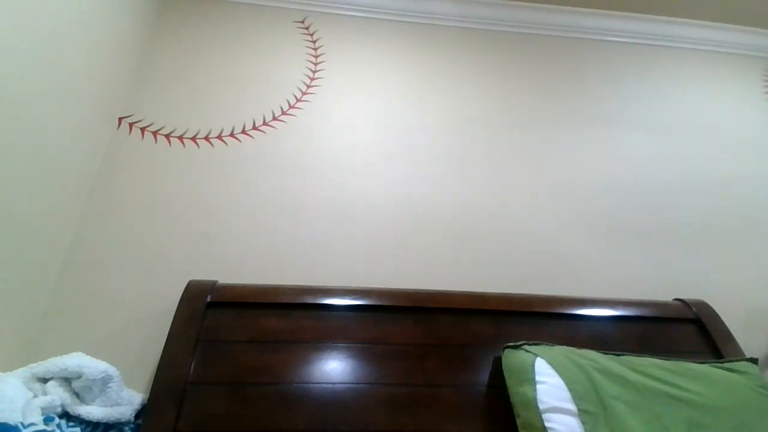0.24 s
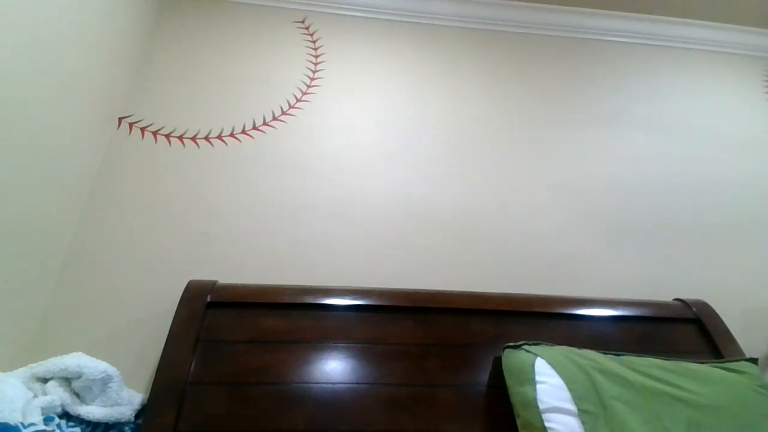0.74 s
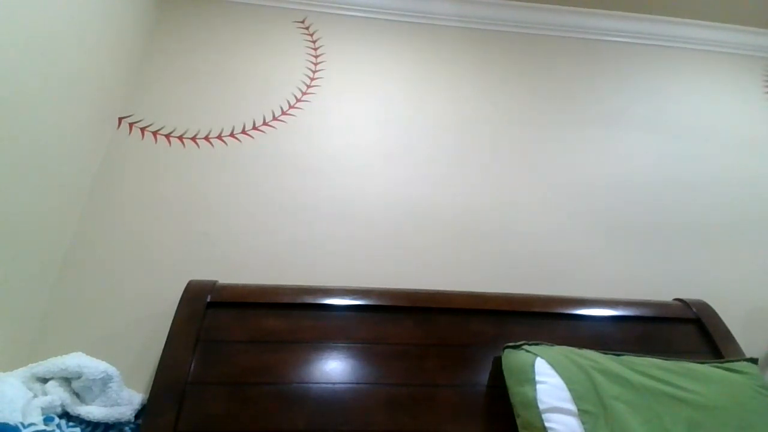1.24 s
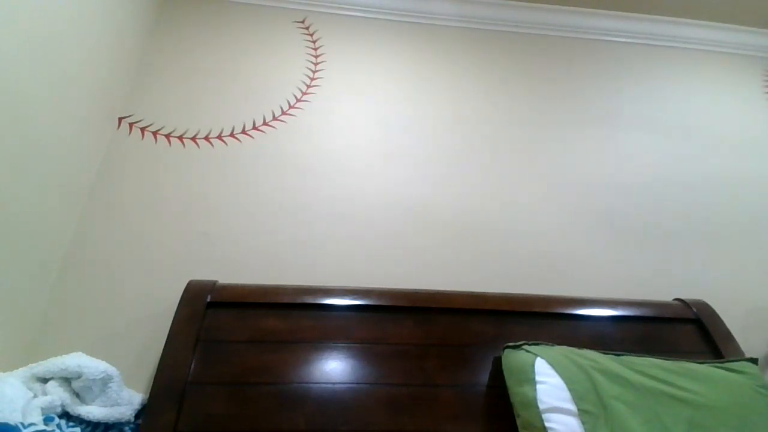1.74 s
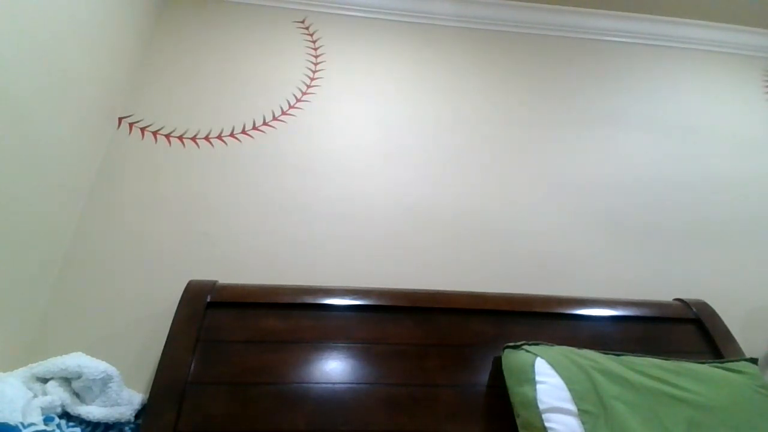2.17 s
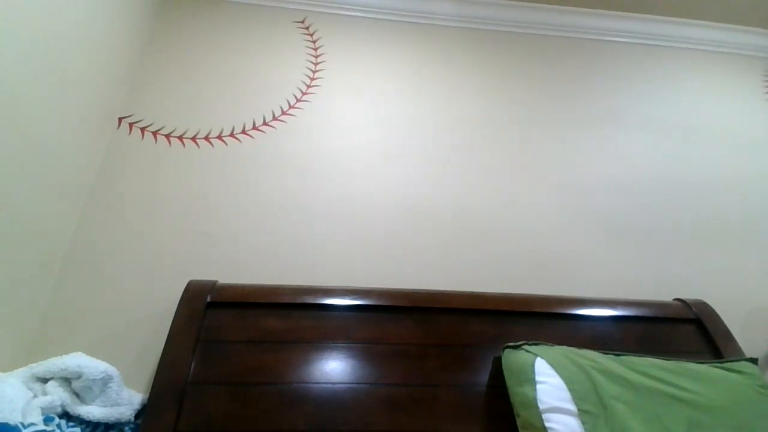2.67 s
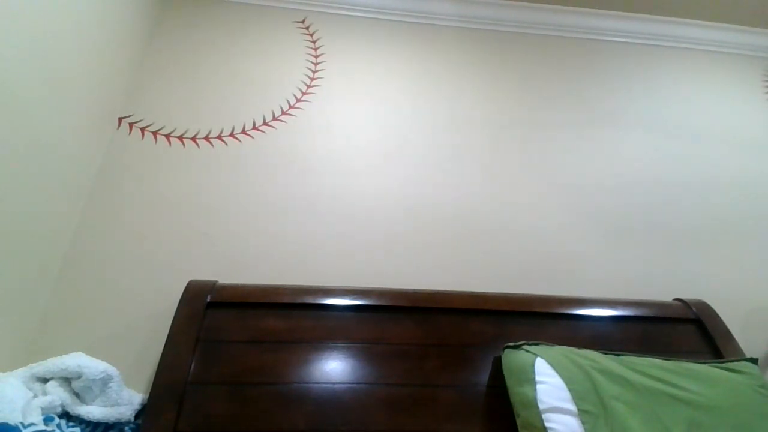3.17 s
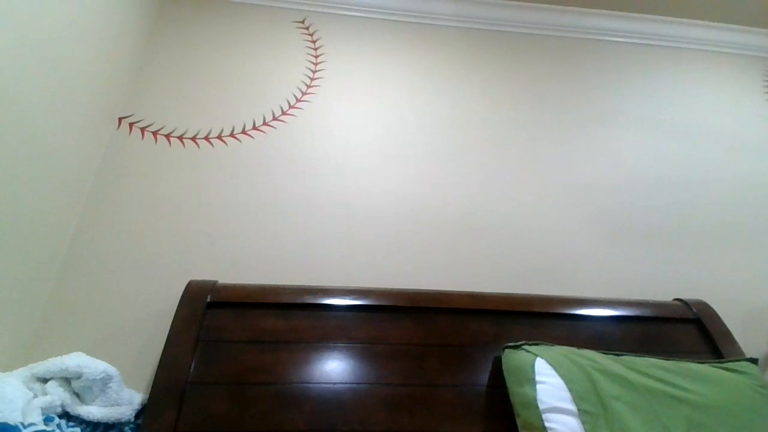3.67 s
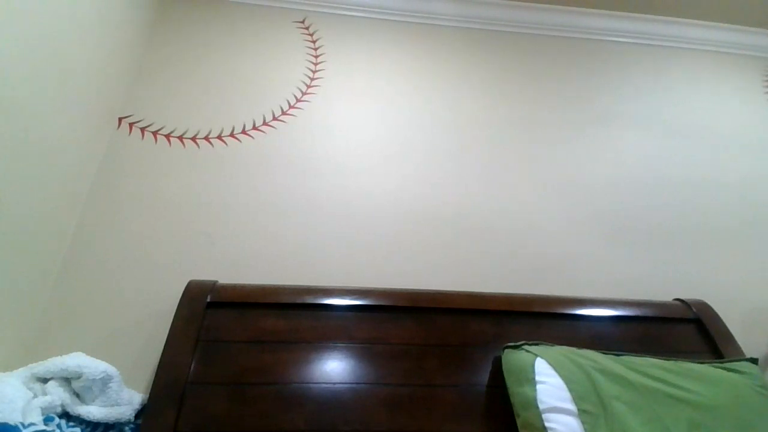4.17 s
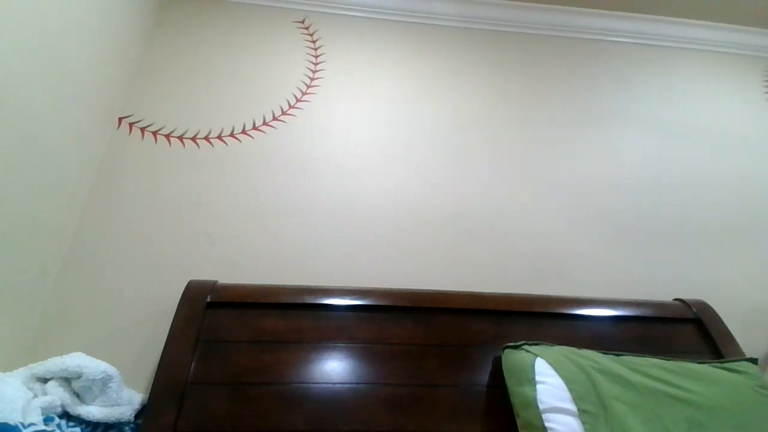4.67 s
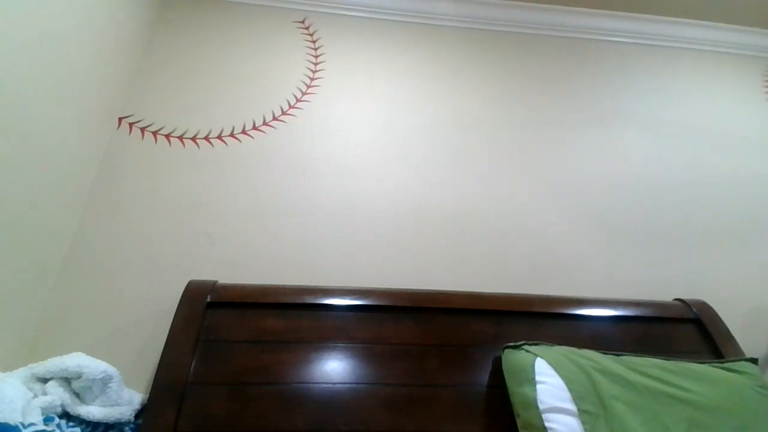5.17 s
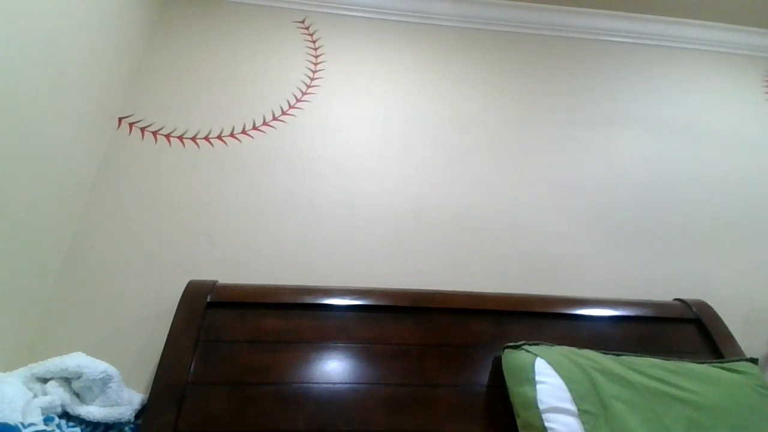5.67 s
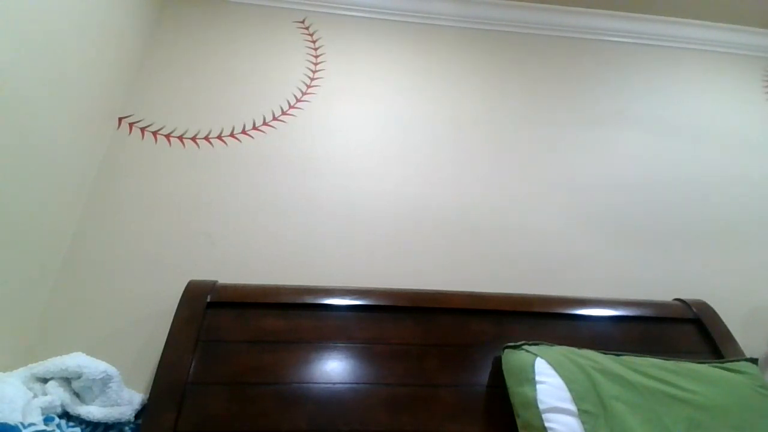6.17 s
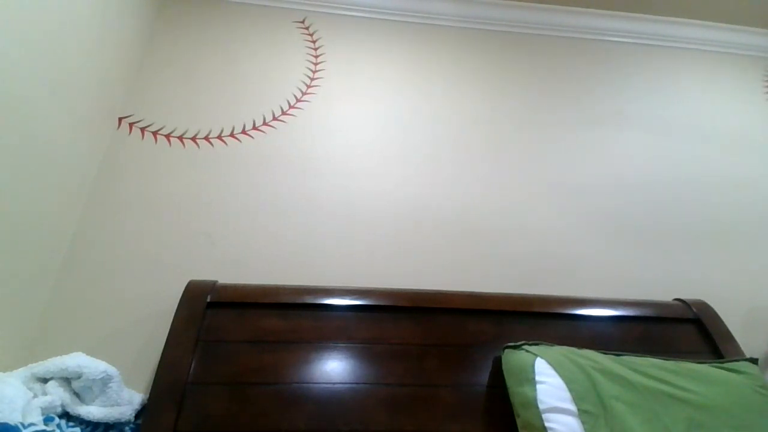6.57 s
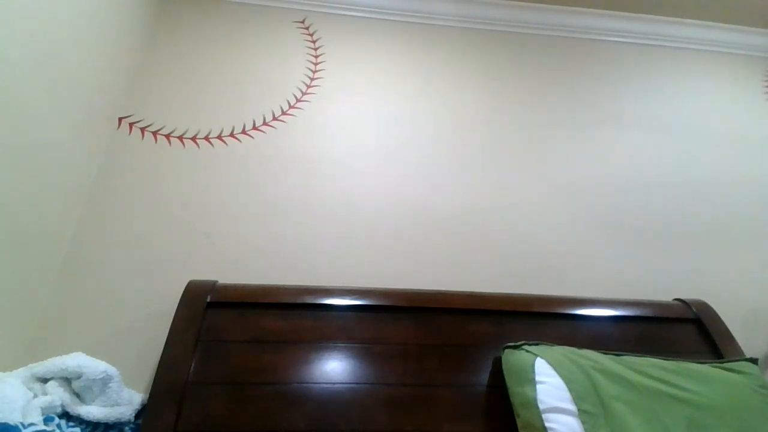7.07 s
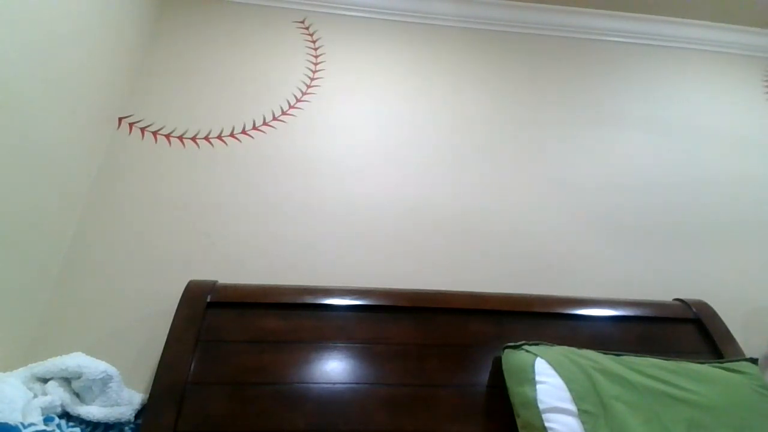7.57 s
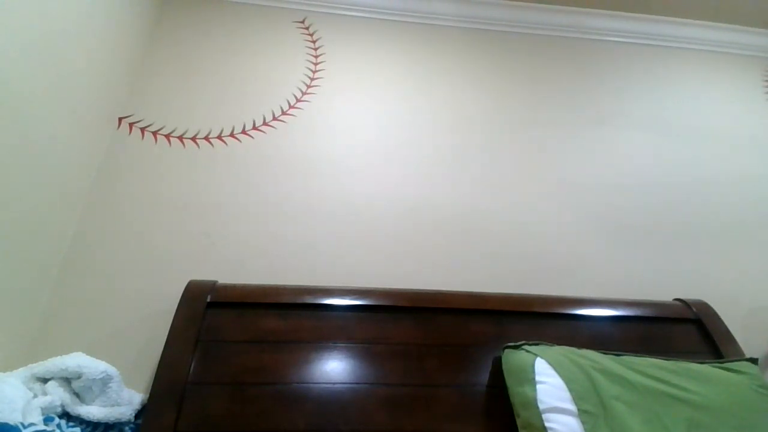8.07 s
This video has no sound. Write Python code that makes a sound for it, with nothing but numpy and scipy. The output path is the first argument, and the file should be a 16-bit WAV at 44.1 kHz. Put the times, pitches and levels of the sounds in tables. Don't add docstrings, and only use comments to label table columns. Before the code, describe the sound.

Close stereo pickup in a furnished bedroom with brief reflections: unseen hands stir pencils, markers and loose paper. Irregular hollow clacks and short scrapes build to a busy clatter and one heavy furniture thud, thin out to isolated knocks, resume with light plastic clinks, then shift to brighter paper rustling with small snaps and a hard tick near the end. Steady low fan rumble, slow air pressure wobble and slight hiss.

```python
import sys
import numpy as np
from scipy import signal
from scipy.fft import rfft, irfft, next_fast_len
from scipy.io import wavfile
from scipy.ndimage import map_coordinates

SR = 44100
rng = np.random.default_rng(int(sys.argv[2]) if len(sys.argv) > 2 else 0)


def to_linear_factor(level_db):
    exponent = np.asarray(level_db, float) / 20
    return 10 ** exponent


def master(y):
    cut = np.clip(np.atleast_2d(y).T, -1, 1)
    pcm = np.round(cut * 32767)
    wavfile.write(sys.argv[1], SR, pcm.astype(np.int16))


N = 366912
SHARED_ONLY = [[1], [0]]


def unit(x):
    return x / np.sqrt(np.mean(x ** 2) + 1e-20)


def along(points, hz):
    f, v = np.transpose(points)
    return np.interp(np.log(hz + .1), np.log(f + .1), v)


def wobble(rate):
    knots = rng.standard_normal(int(N * rate / SR) + 4)
    return map_coordinates(knots, [np.arange(N) * rate / SR])


def noise():
    return rng.standard_normal((2, N))


def filtered(x, response):
    m = next_fast_len(N + SR // 2)
    gain = response(np.fft.rfftfreq(m, 1 / SR))
    gain = gain / np.sqrt(np.mean(np.abs(gain) ** 2))
    return irfft(rfft(x, m) * gain, m)[..., :N]


def coloured(points):
    return lambda hz: to_linear_factor(along(points, hz))


def resonant(peaks, top_hz=20000):
    def response(f):
        total = 0
        for k, (centre, width, db) in enumerate(peaks):
            damping = 1j * f * width
            total = total + (-1) ** k * to_linear_factor(db) * damping / (centre ** 2 - f ** 2 + damping)
        return total / (1 + 1j * f / top_hz) ** 2
    return response


def add(track, s, sound):
    part = track[..., round(s * SR):][..., :sound.shape[-1]]
    part += sound[..., :part.shape[-1]]


def supplies():
    # centre_hz, width_hz, level_db
    box_modes = [(229, 80, -1.5), (343, 120, -1), (457, 90, -1), (853, 285, -1.5)]
    pencil_modes = [(910, 43, 10.5), (1170, 590, 7), (1410, 184, 12.5), (1900, 1380, 1), (2200, 63, -3)]
    pad_modes = [(404, 95, -1.5), (690, 84, 4.5), (1200, 350, 3.5), (1800, 1020, 1.5), (2830, 420, -1.5)]
    # frequency_hz, level_db
    plastic_colour = [(1200, -12.5), (2200, -6.5), (3200, -4), (4800, -7), (6500, -13), (10000, -19.5)]
    paper_colour = [(3000, -10), (5500, 4.5), (8000, 6), (11000, 4), (14000, 0), (16000, 1)]
    swept_colour = [(3000, -10.5), (4400, 1.5), (5500, 1.5), (7000, 2), (9600, -1.5), (11500, 3.5),
                    (13700, 5), (16000, 2)]
    blows, notes = knocks()
    at_pad = np.arange(N) > 6.2 * SR
    blows = np.vstack([blows[0], blows[1] * ~at_pad, blows[2:], blows[1] * at_pad])
    bodies = [resonant(box_modes, top_hz=930), resonant(pencil_modes, top_hz=2970),
              coloured(plastic_colour), coloured(paper_colour), resonant(pad_modes, top_hz=4100)]
    forces = blows + slide()
    box, pencils, plastic, paper, pad = [filtered(f * noise(), body) for f, body in zip(forces, bodies)]
    paper = np.where(at_pad, filtered(paper, coloured(swept_colour)), paper)
    return notes + box + pencils + plastic + pad + paper


def knocks():
    # start_s, peak_db, hardness_db, pitch_hz
    on_pencils = [(0.001, -44.5, -7.5, 910), (0.365, -40, -16.5, 1140), (0.554, -39.5, -27, 1170),
                  (1.268, -33.5, -17, 1210), (1.382, -51, -5, 1170), (1.955, -26.5, 1.5, 1130),
                  (1.96, -32.5, -1.5, 1400), (2.594, -43.5, -15, 930), (2.819, -34.5, -10.5, 1140),
                  (3.113, -39.5, -19.5, 1530), (3.118, -53, -34, 1990), (3.659, -34.5, -0.5, 1100),
                  (3.68, -52.5, 7, 950), (3.666, -45, -1, 1040), (3.741, -47, -18, 1100),
                  (4.846, -58, -26, 910), (4.888, -47.5, -33, 1310), (4.91, -45, -32, 1250),
                  (5.011, -50, -19, 1710), (5.094, -45, -23, 880), (5.24, -38.5, -27, 930),
                  (5.262, -35.5, -25, 1160), (5.519, -48, -37, 1230), (5.773, -48.5, -20, 1210),
                  (7.549, -60.5, -7.5, 1410)]
    # start_s, peak_db, hardness_db, pitch_hz
    on_markers = [(0.794, -49.5, -26, 1340), (1.113, -52, -7, 1510), (1.128, -55, -5, 2000),
                  (1.653, -44, -19, 1200), (1.67, -40, -5.5, 1220), (1.8, -35, -26, 1010),
                  (1.876, -30.5, -3.5, 1300), (1.883, -30, -1, 990), (2.022, -33, -9, 1510),
                  (2.033, -43, -17, 1400), (2.784, -41.5, -21, 1010), (3.569, -52, -14, 1020),
                  (5.044, -49, -6.5, 910), (5.157, -44.5, -12, 885), (5.177, -52.5, 2.5, 910),
                  (5.071, -51, -5.5, 1400), (5.195, -55, 0, 1300), (5.564, -44.5, -6.5, 930),
                  (5.621, -52.5, 1, 1010), (5.674, -39, -4.5, 1410), (5.716, -36.5, -20, 910),
                  (5.978, -65.5, 7.5, 1020), (6.484, -47, -10, 1260), (7.285, -51, -0.5, 1720),
                  (7.298, -63, -4.5, 2360), (7.312, -68, -7, 2000), (7.838, -36, 4, 1750),
                  (7.845, -38, -24, 1730), (7.862, -46, -10, 1570)]
    # start_s, peak_db, hardness_db, pitch_hz
    on_box = [(0.506, -33, -11, 1350), (0.513, -38, -19, 1410), (0.649, -43.5, -8.5, 930),
              (0.575, -51, -25, 1700), (0.595, -63, -25, 1300), (0.733, -53, -43, 1260),
              (1.356, -32.5, -19, 1180), (1.463, -38, -38, 1350), (1.609, -51, -18, 910),
              (1.761, -56, -48, 1090), (1.783, -37, -13, 1750), (2.293, -48.5, -5, 1070),
              (2.373, -51, -4.5, 1000), (2.388, -46, -10, 1700), (2.403, -29, -24, 860),
              (2.441, -52, -28, 848), (3.071, -50, -20, 955), (3.612, -41, -27, 1500),
              (3.53, -59, -25, 1000), (3.64, -59, -33.5, 1010), (4.364, -66, -27, 1030),
              (4.963, -45, -36, 1450), (5.418, -44.5, -20, 1400), (6.453, -47.5, -4, 1290),
              (7.042, -62, -3, 1800), (7.485, -53, -33, 1080)]
    # start_s, peak_db, hardness_db, pitch_hz
    snaps = [(1.934, -43.5, 10, 1430), (1.941, -46, 14.5, 1500), (1.9, -51, -13, 1090),
             (2.012, -40.5, -16, 1390), (2.277, -53.5, -8, 900), (2.561, -50.5, -9, 1080),
             (2.678, -49.5, -10.5, 1080), (3.336, -74, 12.5, 770), (6.387, -64, -2, 1130),
             (6.558, -53, -18, 696), (6.58, -51, -35, 1400), (6.614, -65.5, 7, 674),
             (6.628, -54.5, -5, 2120), (6.996, -72, 5, 1310), (7.098, -71.5, 11.5, 974),
             (7.229, -78, 12.5, 818), (7.639, -61.5, 5, 1530)]
    # start_s, peak_db, hardness_db, pitch_hz
    bumps = [(2.913, -57, -32, 900), (4.482, -49, -24, 790), (7.686, -50.5, -12, 890),
             (4.565, -39, -16.5, 980), (5.587, -52, -14, 1110), (5.627, -66, -22, 1300)]
    # knocks, box over pencils dB, crack over tap dB
    kinds = [(on_pencils, -9.5, 2), (on_markers, -8, -18), (on_box, -5.5, 2), (snaps, 2.3, 6.4),
             (bumps, 8.9, 0.74)]
    contact_s = 0.0058
    first_touch = 1
    rise = np.array([[.6], [.5], [.2], [.15]])
    stretch = np.array([[1.9], [1.8], [1.5], [1.45]])
    force, notes, t = np.zeros((4, N)), np.zeros((2, N)), np.arange(SR // 12) / SR
    for table, box_db, crack_db in kinds:
        for s, db, hard_db, hz in table:
            levels = db + np.array([[box_db - 5.5], [-7], [hard_db + 1.0], [hard_db + crack_db - 1.0]])
            hold_s = contact_s * np.clip(to_linear_factor(-.3 * (levels.max() + 30)), .9, 1.8)
            ending = t / (hold_s * stretch)
            contact = (1 - np.exp(-(t / (hold_s * rise)) ** 2)) * np.exp(-ending ** 4)
            contact = contact * (first_touch + ending) / (first_touch + .5)
            add(force, s, to_linear_factor(levels) * contact)
            pencil = signal.iirpeak(hz, 2.4, SR)
            rough = contact[1] * rng.standard_normal((2, len(t)))
            note = signal.lfilter(*pencil, signal.lfilter(*pencil, rough))
            add(notes, s, to_linear_factor(db + 6.5) * note)
    stutter = to_linear_factor(3 * np.tanh([wobble(250), wobble(300), wobble(450), wobble(450)]))
    return force * stutter, notes


def slide():
    # peak_s, rise_s, fall_s, pencils_db, paper_over_pencils_db
    stirs = [(0.54, 0.023, 0.25, -58, -24), (1.34, 0.098, 0.31, -50, -4.5), (1.46, 0.18, 0.05, -45.5, -27),
             (1.72, 0.28, 0.082, -48.5, -16), (1.93, 0.061, 0.062, -37, -12),
             (2.06, 0.23, 0.12, -48.5, -15), (2.39, 0.017, 0.13, -39.5, -13), (2.49, 0.16, 0.45, -46, -8),
             (2.8, 0.044, 0.3, -61, -18), (3.62, 0.14, 0.072, -55, -20), (3.68, 0.017, 0.1, -51, 2),
             (4.53, 0.88, 0.31, -64, -7), (5.06, 0.057, 0.067, -37.5, -13),
             (5.71, 0.047, 0.076, -43, -10.5), (0.58, .04, 0.044, -62, -20), (5.22, 0.18, 0.18, -46, -10),
             (5.42, 0.1, 0.12, -51.5, -17), (5.62, 0.14, 0.13, -44, -35), (5.92, 0.069, 0.4, -67, 0)]
    # peak_s, rise_s, fall_s, paper_db, pencils_over_paper_db
    sweeps = [(6.41, 0.086, 0.36, -50.5, -9.5), (6.48, 0.037, 0.081, -56, 14), (6.55, .03, 0.025, -66, 3),
              (6.632, 0.011, 0.19, -49, -11), (6.725, 0.066, 0.047, -38.5, -20.5),
              (6.82, 0.056, 0.028, -49, -8.5), (6.9, 0.19, 0.22, -46.5, -25.5),
              (7.005, 0.011, 0.036, -61, -11), (7.045, 0.2, 0.049, -60.5, 13),
              (7.105, 0.015, .03, -63, -20), (7.29, 0.033, 0.14, -47.5, -12), (7.42, 0.018, 0.053, -65, -5),
              (7.58, 0.05, 0.061, -52.5, 0), (7.655, 0.013, 0.069, -54, -23), (7.71, 0.05, 0.23, -44, -1),
              (7.78, 0.078, 0.16, -46.5, 3.5), (7.865, 0.061, 0.17, -53, 8.5), (7.98, 0.055, 0.11, -56, -6),
              (8.045, 0.066, 0.06, -62, -21), (8.32, 0.0026, 0.1, -43, -18)]
    # peak_s, rise_s, fall_s, box_db, pencils_over_box_db
    rocks = [(0.72, 0.21, 0.13, -56.5, 1), (1.8, .03, 0.14, -46.5, -15), (2.32, 0.052, 0.029, -52, -16),
             (2.47, 0.065, 0.096, -39, -18), (2.9, 0.38, 0.094, -54, -26), (3.66, 0.11, 0.12, -51.5, -8),
             (4.93, 0.096, 0.13, -57, -6), (7.48, 0.076, 0.058, -65, 6)]
    # level_db of box, pencils, plastic, paper
    rest_db = [-72, -81, -102, -80]
    slips = 1.5 * wobble(30) + 1.8 * wobble(180)
    grip = np.array([[1.1], [1.1], [.9], [.6], [1.2]])
    heap = strokes(stirs, layer_db=[-10, -2, -0.5, 0], share=[0, 0, 1, 1], rounded=1.26)
    heap = heap + strokes(rocks, layer_db=[-0.5, -8, -43, -15], share=[0, 1, 1, 1], rounded=1.44)
    box, pad, plastic, paper = strokes(sweeps, layer_db=[-10.5, -1, -1.5, 0.5],
                                       share=[0.9, 0.69, 0.59, 0.014], rounded=1.56)
    heap = heap + to_linear_factor(rest_db)[:, None] + [box, 0 * pad, plastic, paper]
    return np.vstack([heap, pad]) * to_linear_factor(-5.5 + grip * slips)


def strokes(rows, layer_db, share, rounded):
    t, force = np.arange(0, N, 64) / SR, 0
    for s, rise, fall, db, mix_db in rows:
        away = np.where(t < s, (s - t) / abs(rise), (t - s) / abs(fall))
        levels = db + np.array(layer_db) + mix_db * np.array(share)
        force = force + to_linear_factor(levels[:, None] - 20 * away ** rounded)
    return np.array([np.interp(np.arange(N) / SR, t, layer) for layer in force])


def taps():
    # start_s, peak_db, pitch_hz
    pencil_taps = [(0.376, -39, 1220), (0.515, -21.5, 1228), (0.526, -36, 1240), (0.537, -37, 1220),
                   (0.554, -33, 1170), (0.562, -33, 1350), (0.579, -36, 930), (0.591, -46, 1260),
                   (0.655, -47, 1280), (0.738, -39, 1290), (0.799, -45, 1200), (1.276, -28, 1184),
                   (1.285, -37, 1150), (1.296, -39, 1130), (1.361, -37, 1230), (1.372, -36, 1240),
                   (1.382, -34, 1180), (1.469, -29, 1310), (1.48, -35, 1370), (1.654, -35, 1200),
                   (1.681, -36, 1090), (1.768, -41, 1140), (1.799, -31, 1350), (1.806, -25.5, 930),
                   (1.877, -25, 1267), (1.886, -26, 1250), (1.943, -25, 1480), (1.96, -24, 1170),
                   (2.029, -26, 1410), (2.398, -31, 1380), (2.408, -36, 880), (2.42, -29, 1410),
                   (2.432, -39, 1130), (2.499, -34, 953), (2.604, -38, 910), (2.79, -27.5, 1017),
                   (2.815, -45, 1044), (2.826, -28, 1185), (2.844, -32, 1140), (3.12, -33, 970),
                   (3.616, -39, 790), (3.666, -28.5, 990), (3.684, -33, 915), (3.743, -33, 1163),
                   (4.484, -47, 810), (4.568, -38, 980), (4.589, -40, 1070), (4.974, -40, 1520),
                   (5.049, -33, 1410), (5.075, -39, 1110), (5.249, -32.5, 934), (5.264, -33, 1130),
                   (5.571, -41, 1070), (5.589, -31, 1120), (5.629, -36, 1226), (5.682, -31, 915),
                   (5.716, -39, 923), (5.736, -36, 1510), (7.044, -45, 1066), (7.844, -21, 1750)]
    rise_s, t60_s, overtone, overtone_db = 0.0015, 0.033, 1.7, -15
    out, t = np.zeros(N), np.arange(SR // 20) / SR
    for s, db, hz in pencil_taps:
        shape = (1 - np.exp(-(t / rise_s) ** 2)) * to_linear_factor(db - 1.5 - 60 * t / t60_s)
        phase = 2 * np.pi * hz * t
        add(out, s, shape * (np.sin(phase) + to_linear_factor(overtone_db) * np.sin(overtone * phase)))
    return out


def cracks():
    # start_s, peak_db, pitch_hz
    edge_cracks = [(1.352, -47, 3630), (1.269, -46, 2140), (1.363, -40, 3240), (0.652, -53, 3340),
                   (1.877, -36, 3900), (1.936, -34, 5400), (1.945, -38, 6900), (1.957, -28, 6680),
                   (1.965, -37, 3620), (2.82, -43, 5140), (3.666, -35, 4600), (3.667, -38, 2600),
                   (3.688, -46, 4300), (5.047, -43, 5000), (5.055, -41, 6900), (5.563, -47, 4500),
                   (5.59, -47, 6000), (5.627, -44, 2720), (5.643, -55, 2800), (5.675, -42, 4540),
                   (5.683, -38, 6660), (6.386, -45, 12500), (6.396, -45, 8500), (6.4555, -38, 12500),
                   (6.557, -40, 12000), (6.625, -37, 12100), (6.626, -44, 5750), (6.8, -41, 13000),
                   (6.801, -47, 6000), (6.957, -45, 13500), (6.999, -35, 12600), (7, -44, 7100),
                   (7.009, -43, 7540), (7.008, -45, 14500), (7.098, -50, 6500)]
    t60_s, spacing = 0.025, 1.075
    out, t = np.zeros(N), np.arange(SR // 20) / SR
    for s, db, hz in edge_cracks:
        partials = sum(np.sin(2 * np.pi * hz * spacing ** k * t) for k in range(-2, 3))
        add(out, s, to_linear_factor(db - 6.5 - 60 * t / t60_s) * partials)
    return out


def ring(db, hz, t60, rise=0.0008):
    t = np.arange(SR // 3) / SR
    return to_linear_factor(db - 60 * t / t60) * np.sin(2 * np.pi * hz * t) * (1 - np.exp(-t / rise))


def thuds():
    # start_s, peak_db, pitch_hz, t60_s
    panel_thuds = [(2.41, -13, 503, 0.07), (2.408, -23, 890, 0.06), (2.412, -29, 278, 0.13),
                   (7.645, -49, 453, 0.083), (3.117, -31.5, 258, 0.051), (4.484, -29, 532, 0.08),
                   (4.486, -37, 810, 0.06), (4.567, -28.5, 513, 0.063), (4.568, -32, 756, 0.053),
                   (4.567, -28.5, 257, 0.067), (4.575, -32, 145, 0.08), (4.592, -31, 178, 0.06),
                   (6.482, -30.5, 451, 0.048), (7.416, -49, 690, 0.046), (7.773, -27, 140.7, 0.28),
                   (7.806, -34, 139, 0.16), (7.849, -33, 350, 0.071), (0.509, -28, 687, 0.045),
                   (0.514, -25, 1482, 0.053), (3.118, -40, 1900, 0.059), (3.121, -46, 1540, 0.037),
                   (7.289, -41, 1980, .06), (4.575, -39, 1010, 0.052), (6.487, -40, 1300, .04)]
    out = np.zeros(N)
    for s, db, hz, t60 in panel_thuds:
        add(out, s, ring(db - 2.5, hz, t60, rise=0.0025))
        add(out, s, ring(db - 16.0, 1.3 * hz, 1.6 * t60))
        add(out, s, ring(db - 6.5, 0.855 * hz, t60, rise=0.0049))
    return out


def clinks():
    # start_s, peak_db, pitch_hz
    hard_clinks = [(5.0948, -50, 7600), (5.132, -73, 7840), (5.181, -52, 6700), (5.575, -67, 7600),
                   (5.588, -57, 7590), (5.622, -49.5, 7300), (5.628, -52, 7500), (5.641, -63, 7300),
                   (5.628, -54, 3300), (5.634, -59, 2640), (5.678, -44, 4620), (7.839, -44, 6100),
                   (5.72, -56, 6650), (5.7788, -67, 7600), (6.999, -55, 7300)]
    chatter = to_linear_factor(4 * np.tanh(wobble(220)))
    out = np.zeros(N)
    for s, db, hz in hard_clinks:
        tone = ring(db + 11.0, hz, 0.04, rise=0.0018)
        tone = tone + ring(db + 16.5, 1.02 * hz, 0.02, rise=0.0017) + ring(db + 8.0, 4120, 0.034)
        add(out, s, chatter[round(s * SR):][:len(tone)] * tone)
    return out


def buzz():
    # start_s, peak_db, length_s
    shakes = [(0.38, -66, 0.03), (0.506, -50.5, 0.021), (0.5594, -75, 0.035), (0.6524, -75, 0.03),
              (0.76, -79, 0.024), (1.6392, -63, 0.03), (1.699, -56, 0.025), (1.7494, -81, 0.027),
              (1.79, -55, 0.037), (2.394, -48, .04), (2.443, -44, 0.018), (2.498, -57, 0.025),
              (2.558, -46, 0.013)]
    # centre_hz, width_hz, level_db
    metal_modes = [(12200, 430, 19), (13300, 90, -31)]
    shake, t = np.zeros(N), np.arange(SR // 6) / SR
    for s, db, length in shakes:
        add(shake, s, to_linear_factor(db - 1.5) * np.exp(-t / max(length, .004)))
    return filtered(shake * noise(), resonant(metal_modes))


def walls(x):
    # frequency_hz, t60_s
    decay = [(200, 0.3), (1000, 0.25), (4000, 0.26), (12000, 0.2)]
    # frequency_hz, level_db
    soak = [(200, -1.5), (900, -3), (2000, -1.5), (4000, -1), (12000, -7.5)]
    size = round(0.3 * SR)
    parts = np.pad(x.sum(axis=0), (200, size - (N + 200) % size)).reshape(-1, 1, size)
    hz, t, z = signal.stft(rng.standard_normal((len(parts), 2, SR // 3)), SR, nperseg=256)
    tail_db = along(soak, hz)[:, None] - 60 * t / along(decay, hz)[:, None]
    tails = signal.istft(z * to_linear_factor(tail_db), SR, nperseg=256)[1]
    early_norm = np.linalg.norm(tails[..., :SR // 20]) / len(parts) ** .5
    answers = signal.fftconvolve(parts, tails / early_norm, axes=2)
    out = np.zeros((2, N))
    for k, answer in enumerate(answers):
        add(out, k * size / SR, answer)
    return out


def air():
    # frequency_hz, rms_db
    hum_lines = [(14.1, -43.5), (30, -58.5), (60, -64), (120.1, -54), (245, -69.5)]
    # frequency_hz, level_db
    sway_colour = [(1, -2.5), (3, 4), (7.5, 1.5), (9, -3), (13, -7.5), (17, 1.5), (22, -85)]
    # time_s, level_db
    sway_course = [(0.2, -32.5), (3.79, -35.5), (4.19, -29), (5.28, -35.5), (6.46, -30), (8.2, -32.5)]
    # frequency_hz, level_db
    rumble_colour = [(13, -29), (22, -21.5), (37, -3.5), (70, -13.5), (108, -13.5), (128, -21), (144, -14),
                     (188, -22.5), (247, -31.5), (296, -35.5), (500, -48.5), (650, -79), (1100, -120)]
    t, hum = np.arange(N) / SR, 0
    for hz, db in hum_lines:
        level = np.sqrt(2) * to_linear_factor(db + 2.1 * wobble(2.67))
        hum = hum + level * np.sin(2 * np.pi * hz * t + 0.45 * wobble(2.47))
    sway_db = np.interp(t, *np.transpose(sway_course)) - 3.0
    sway = to_linear_factor(sway_db) * unit(filtered(noise(), coloured(sway_colour + [(40, -67.5)])))
    rumble = to_linear_factor(-52) * filtered(noise(), coloured(rumble_colour))
    return hum * SHARED_ONLY + sway + rumble + hiss(db=-13.0)


def hiss(db):
    # frequency_hz, level_db
    hiss_colour = [(250, 12.5), (450, 6.5), (1000, -2), (2000, -0.5), (4000, -2), (8000, -3.5), (12000, -3),
                   (16000, 1)]
    return to_linear_factor(-67.5 + db) * filtered(noise(), coloured(hiss_colour))


def ports(pair):
    # frequency_hz, likeness (0 to 1)
    coherence = [(60, 0.95), (250, 0.99), (600, 0.97), (1200, 0.93), (3000, 0.67), (8000, 0.038),
                 (14000, 0.02)]
    # frequency_hz, level_db
    left_over_right = [(100, 0.9), (600, 0.8), (2500, 3), (5000, 2), (12000, 3)]
    m = next_fast_len(N + 4096)
    hz = np.fft.rfftfreq(m, 1 / SR)
    turn = np.arccos(np.clip(along(coherence, hz), -1, 1)) / 2
    shared, unshared = rfft(pair, m) * [np.cos(turn), np.sin(turn)]
    lead = to_linear_factor(along(left_over_right, hz) / 2) * np.exp(1j * np.pi * hz * 0.00012)
    return irfft([(shared + unshared) * lead, (shared - unshared) / lead], m)[:, :N]


def scene():
    struck = (taps() + cracks() + thuds() + clinks()) * SHARED_ONLY
    hand = supplies() + struck + buzz()
    return ports(hand + to_linear_factor(-6.5) * walls(hand) + air()) + hiss(db=3.0) * to_linear_factor([[1.1], [-1.1]])


def roll_off(x):
    return signal.sosfilt(signal.butter(12, 16990, fs=SR, output="sos"), x)


def record(dry):
    return roll_off(dry)


dry = scene()
out = record(dry)
master(out)
```